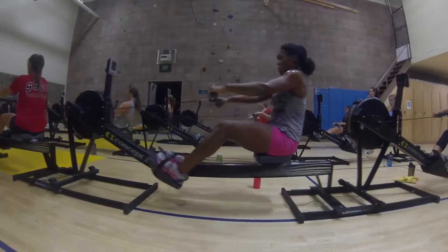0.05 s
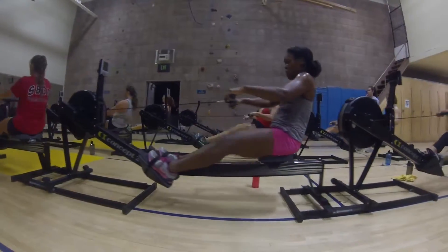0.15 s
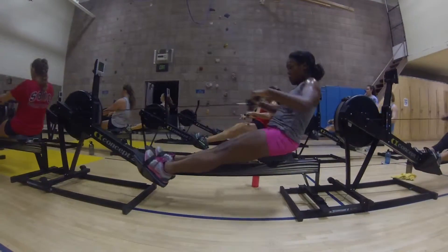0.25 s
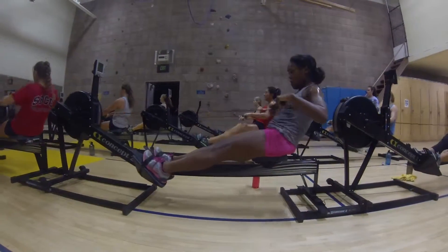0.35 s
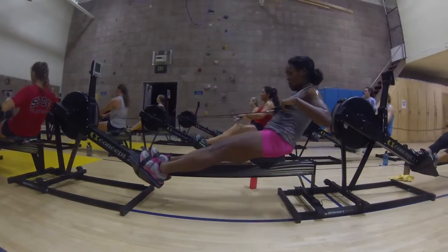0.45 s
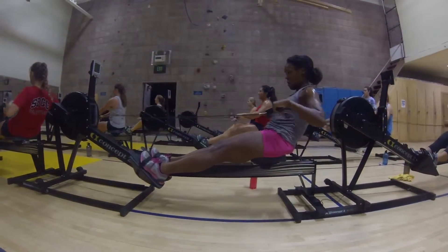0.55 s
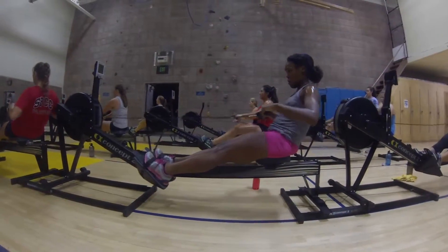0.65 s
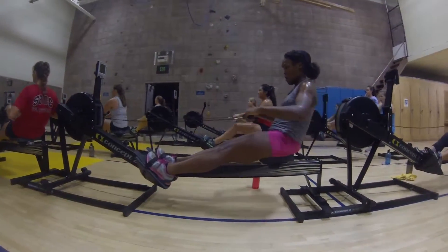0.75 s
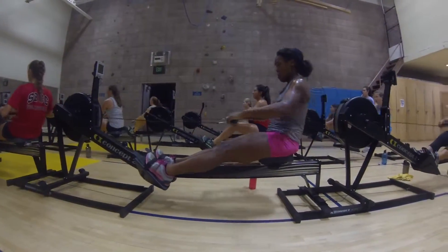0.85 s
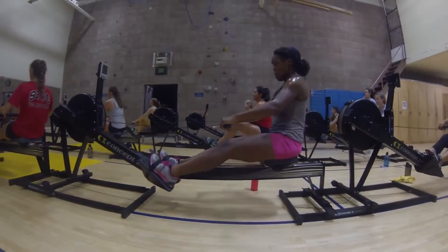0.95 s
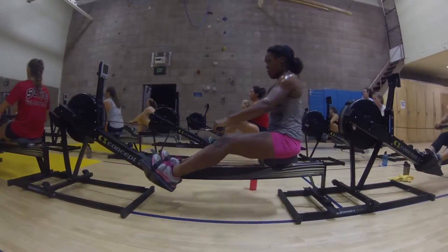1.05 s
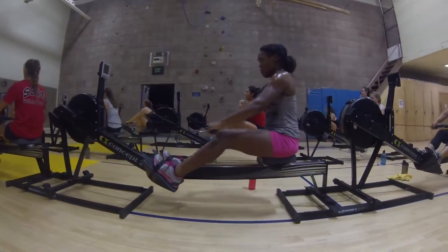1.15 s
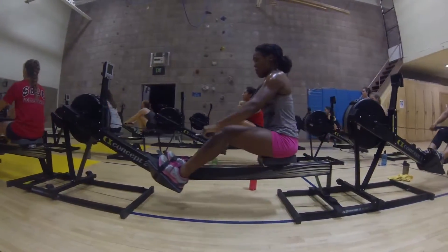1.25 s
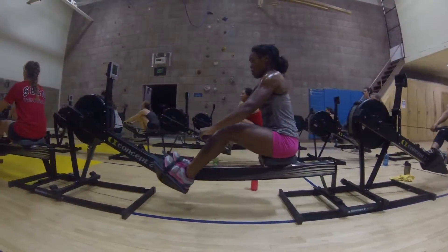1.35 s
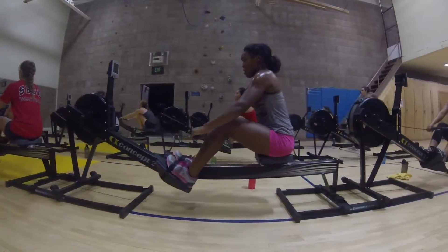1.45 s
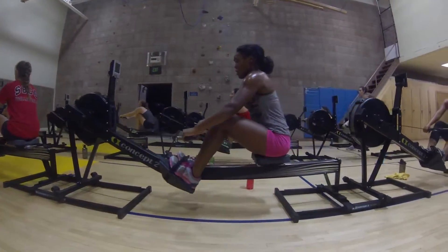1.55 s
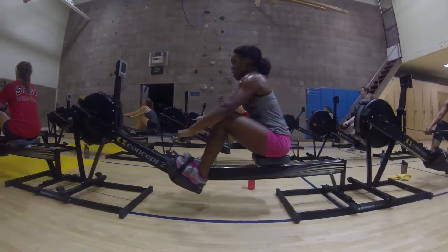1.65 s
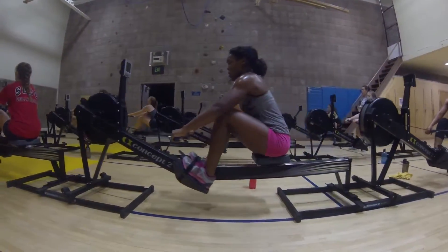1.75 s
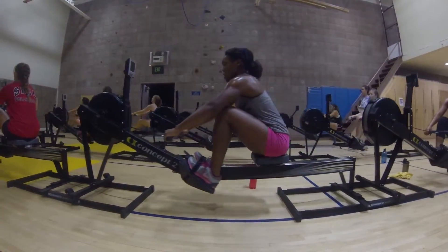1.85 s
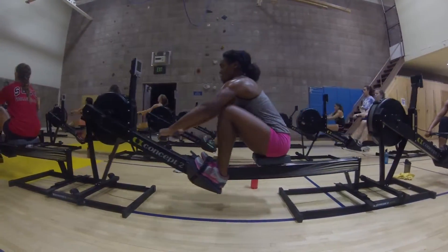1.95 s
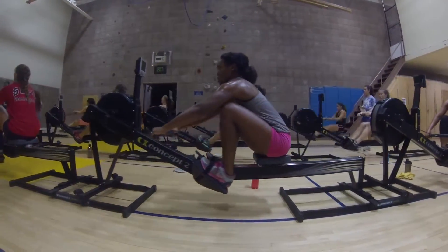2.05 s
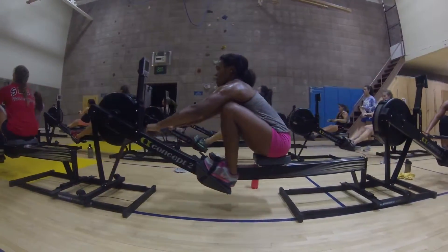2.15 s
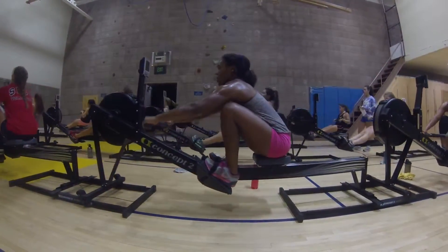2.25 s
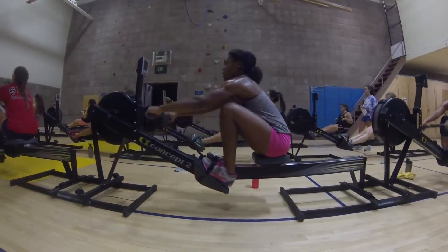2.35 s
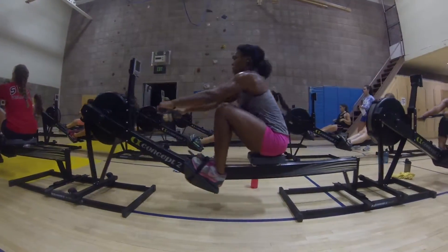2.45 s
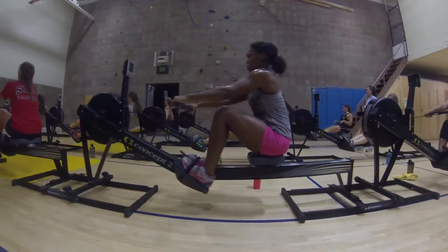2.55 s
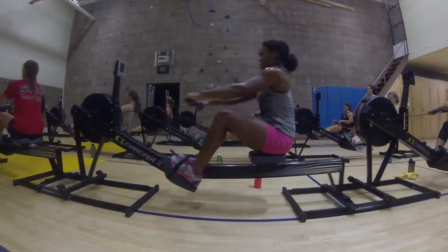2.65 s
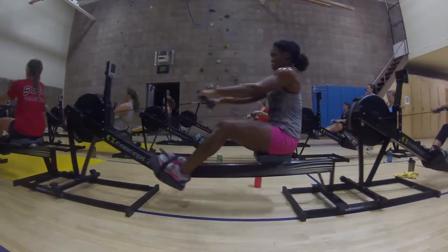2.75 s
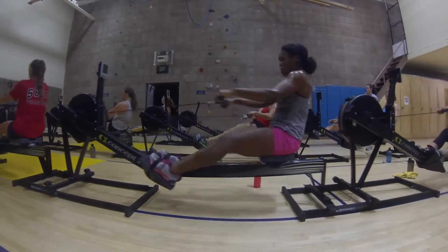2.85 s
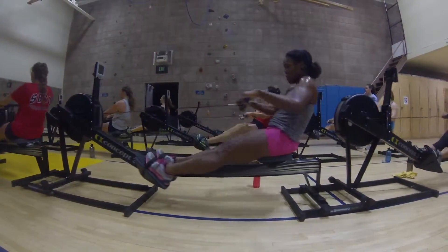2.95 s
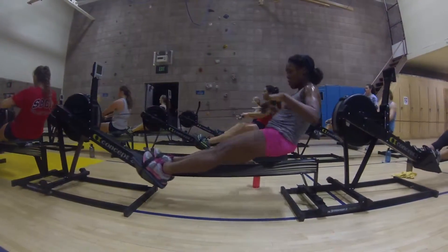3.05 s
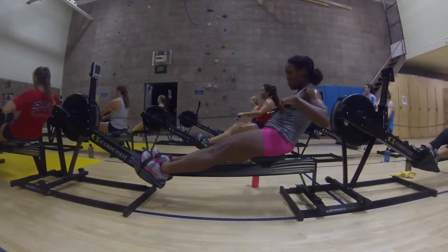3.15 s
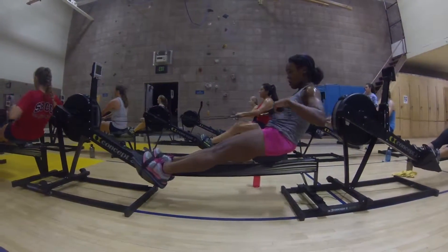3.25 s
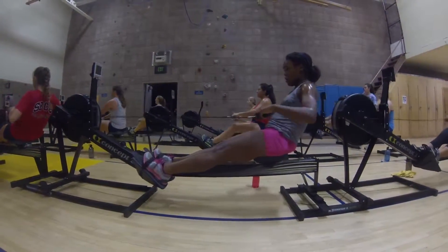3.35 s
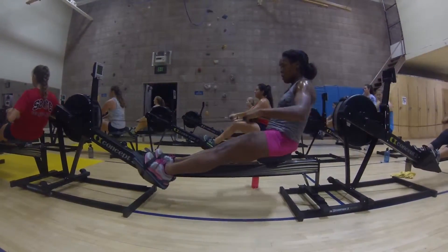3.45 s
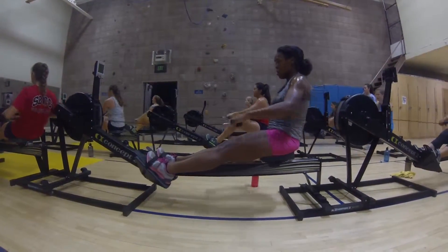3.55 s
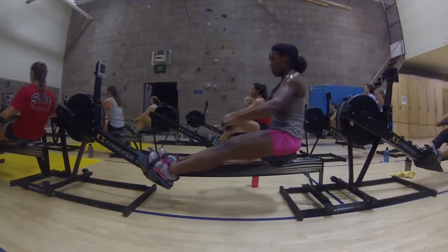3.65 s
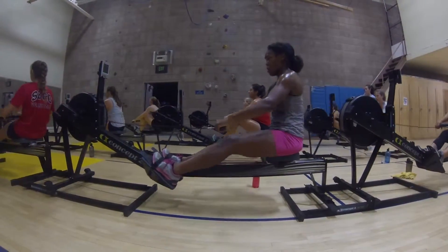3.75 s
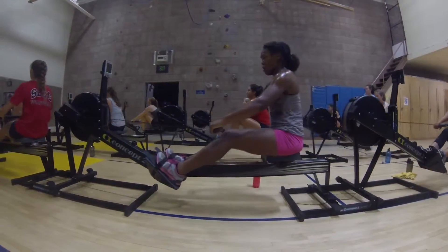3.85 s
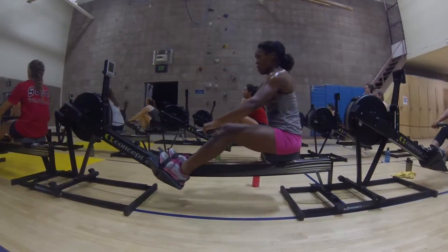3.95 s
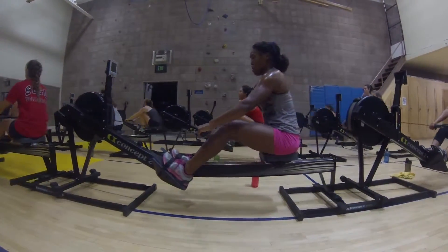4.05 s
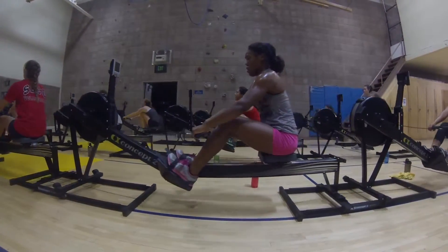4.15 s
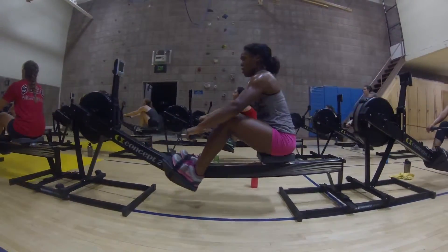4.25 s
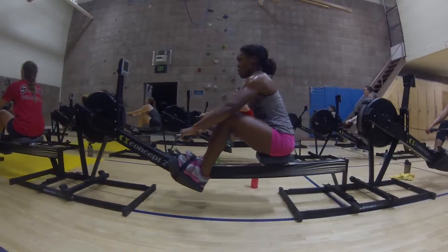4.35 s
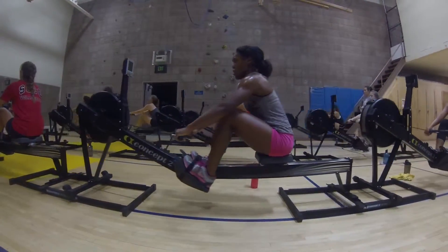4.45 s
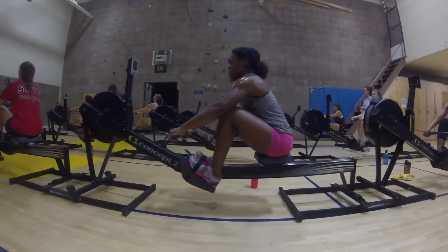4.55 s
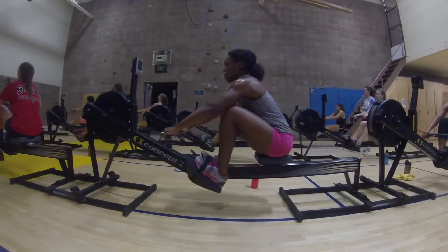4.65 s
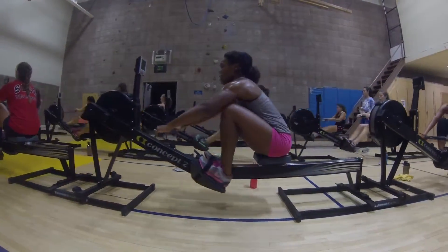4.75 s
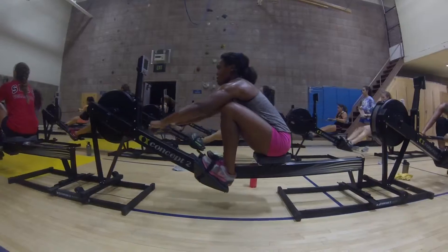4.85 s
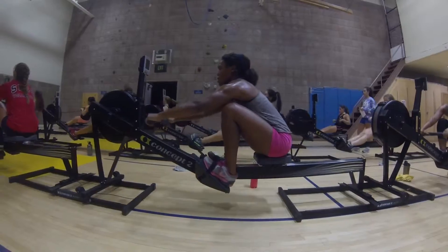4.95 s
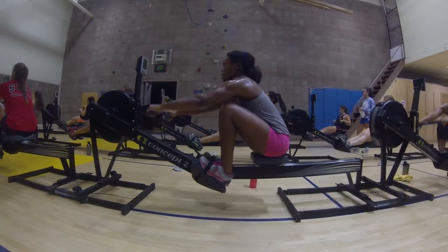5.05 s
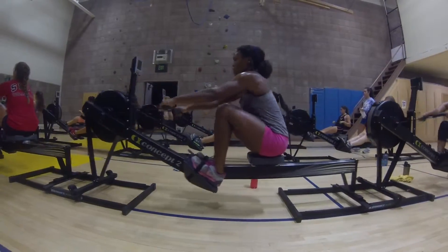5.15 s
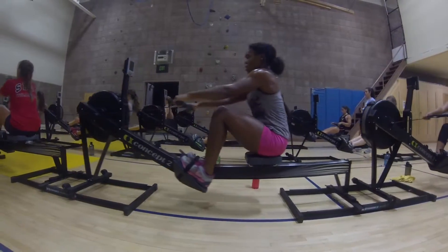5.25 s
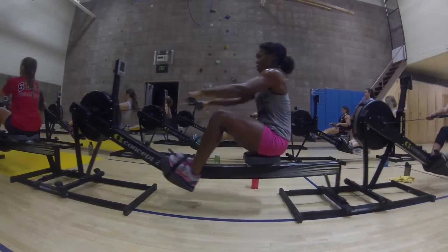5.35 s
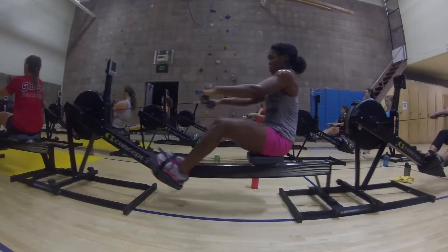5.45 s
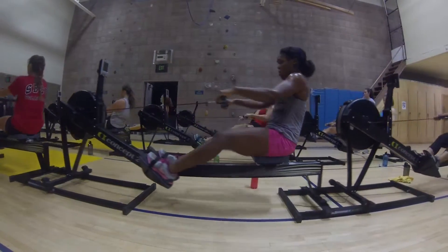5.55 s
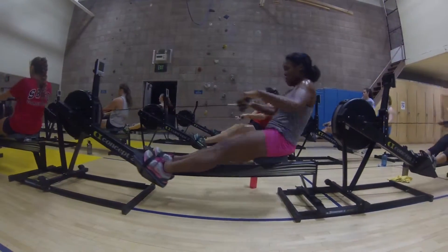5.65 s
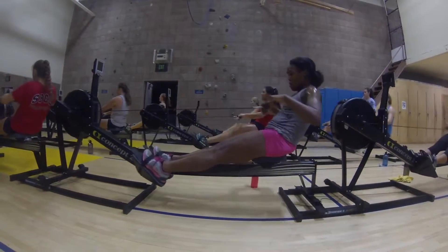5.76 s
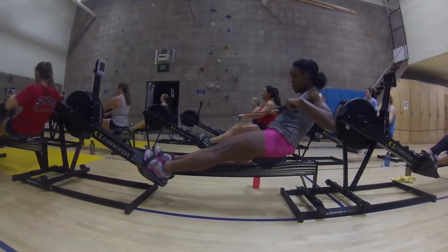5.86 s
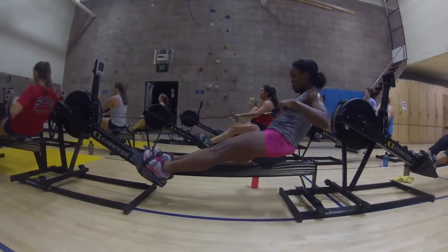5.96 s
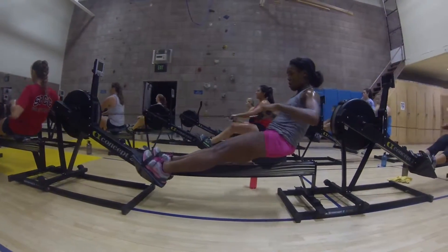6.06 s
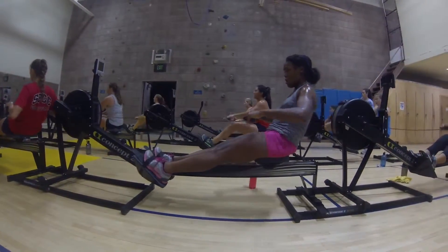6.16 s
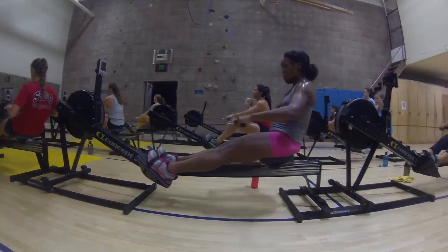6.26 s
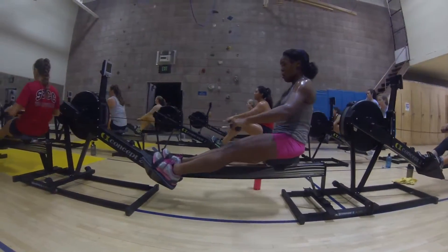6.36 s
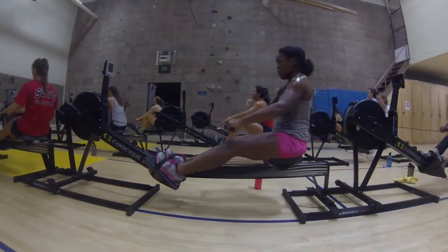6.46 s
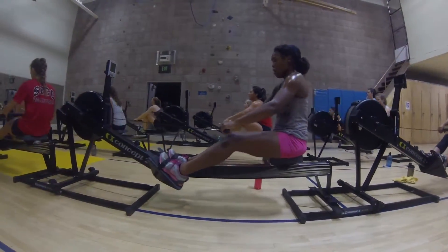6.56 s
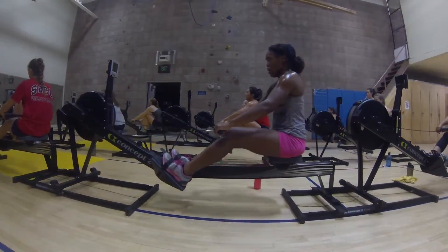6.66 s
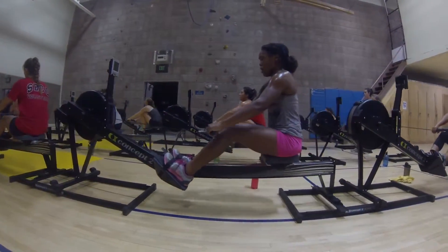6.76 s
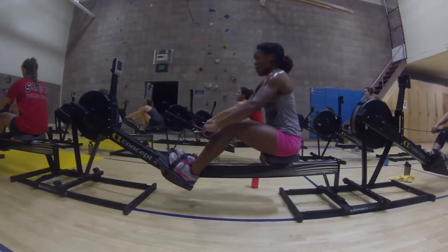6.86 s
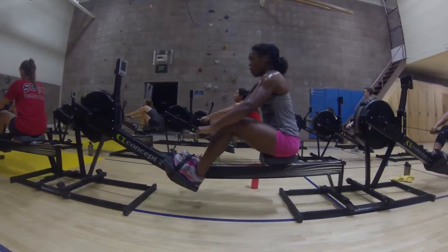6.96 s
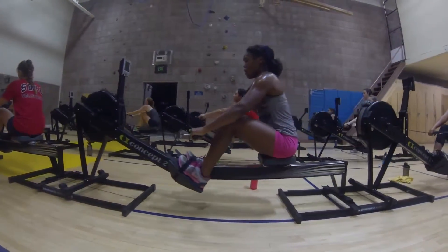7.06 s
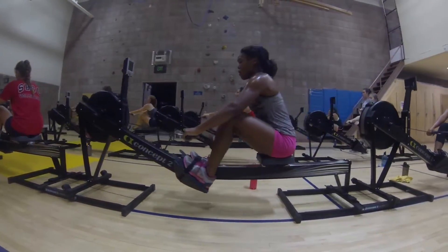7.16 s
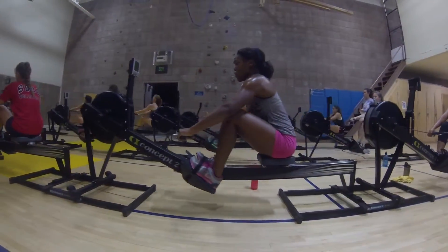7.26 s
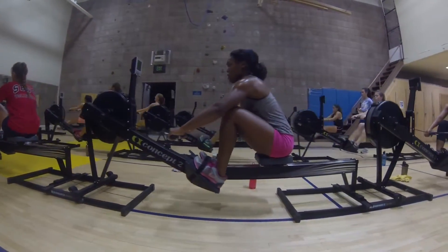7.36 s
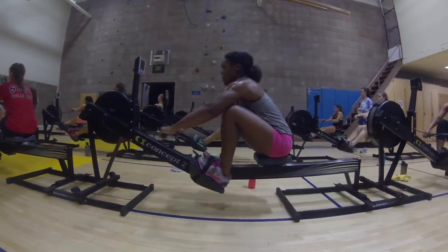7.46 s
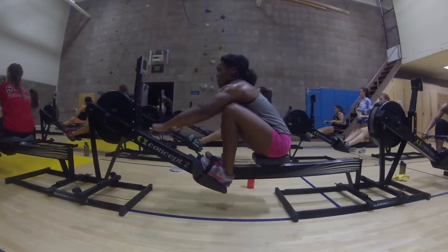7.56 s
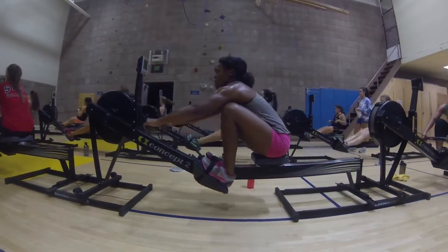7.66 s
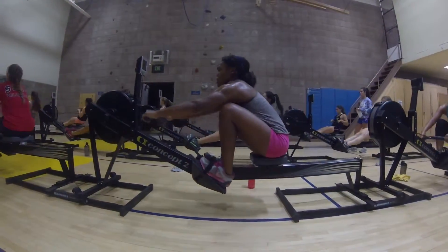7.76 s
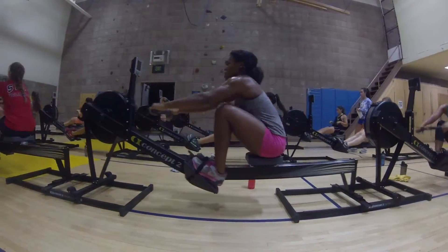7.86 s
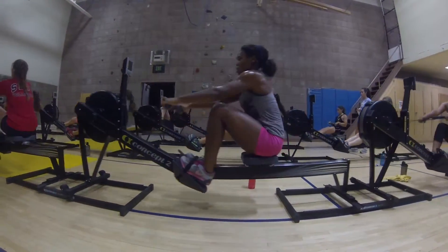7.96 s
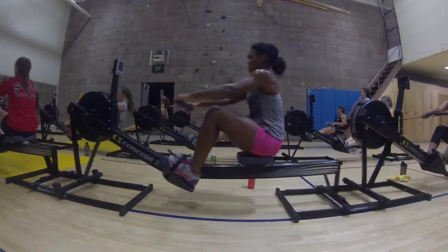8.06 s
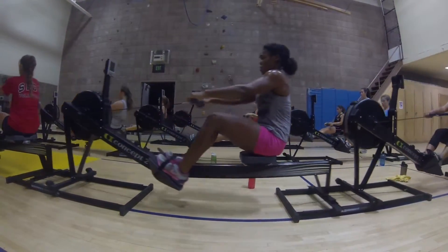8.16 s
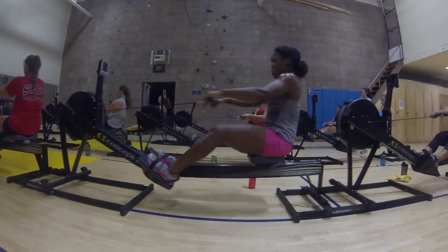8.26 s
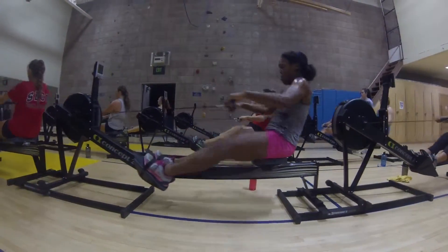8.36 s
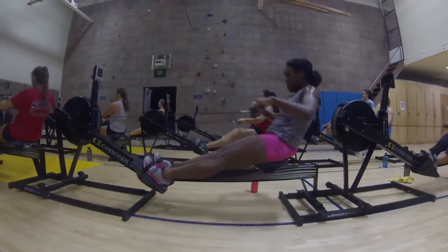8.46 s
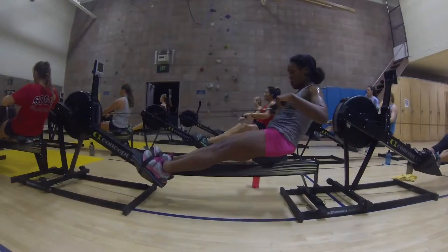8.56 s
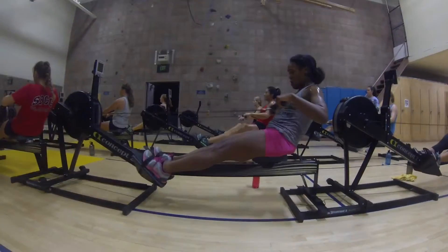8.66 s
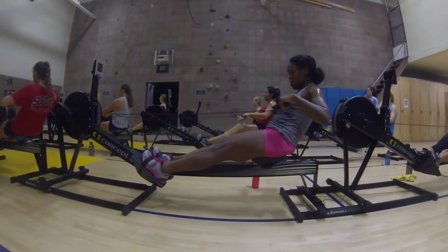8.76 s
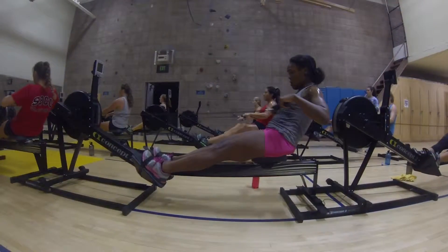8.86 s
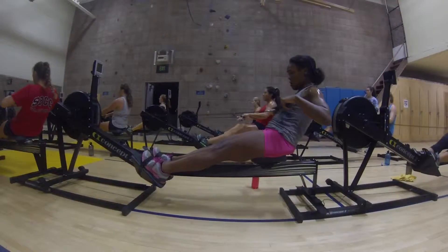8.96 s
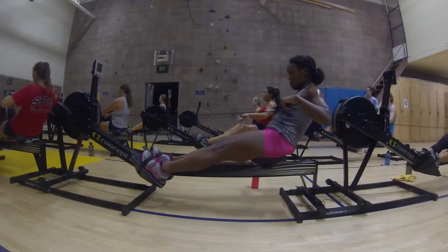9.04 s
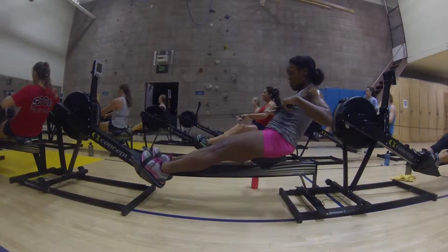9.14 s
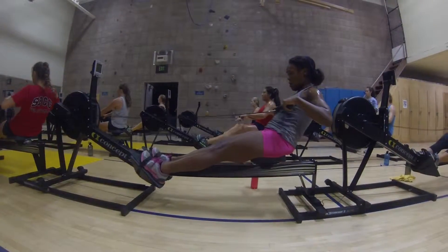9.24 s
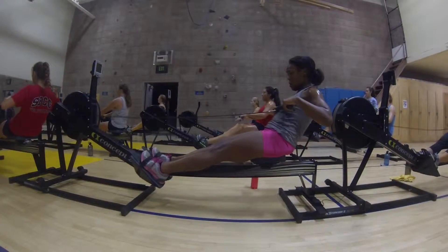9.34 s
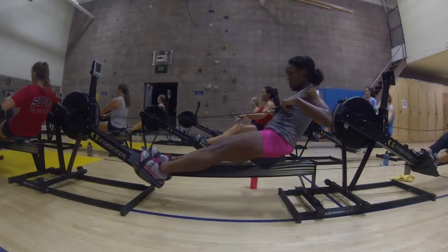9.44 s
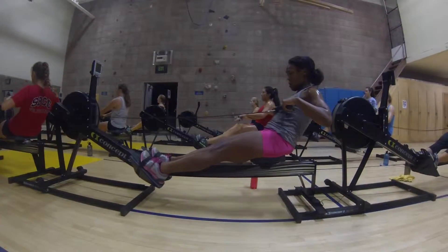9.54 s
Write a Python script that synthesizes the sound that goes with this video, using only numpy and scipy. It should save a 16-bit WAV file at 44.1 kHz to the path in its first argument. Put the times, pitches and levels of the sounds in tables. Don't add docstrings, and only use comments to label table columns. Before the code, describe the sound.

Rowing machine flywheels whir steadily in a gym hall, swelling with each stroke, with sharp plastic ticks and low floor thuds, heard through a sealed case.

```python
import sys
import numpy as np
from scipy import signal
from scipy.fft import rfft, irfft
from scipy.io import wavfile
from scipy.ndimage import uniform_filter1d

SR = 44100
rng = np.random.default_rng(int(sys.argv[2]) if len(sys.argv) > 2 else 0)


def materialize(psi):
    bounded = np.clip(np.atleast_2d(psi).T, -1, 1)
    quanta = np.round(bounded * 32767).astype(np.int16)
    wavfile.write(sys.argv[1], SR, quanta)


def gain_from_decibels(decibels):
    exponent = np.asarray(decibels, float) / 20
    return 10 ** exponent


N = 423360


def unit(x):
    return x / np.sqrt(np.mean(x ** 2))


def band(x, lo_hz, hi_hz):
    return signal.sosfilt(signal.butter(2, (lo_hz, hi_hz), "bandpass", fs=SR, output="sos"), x)


def walk(rate):
    hold = int(SR / rate)
    levels = np.repeat(rng.standard_normal(N // hold + 1), hold)
    return 1.4 * uniform_filter1d(uniform_filter1d(levels, hold), hold)[:N]


def swells(rows, attack_s, release_s):
    t = np.arange(N) / SR
    total_db = np.zeros(N)
    for start_s, rise_db, hold_s in rows:
        corners_s = np.cumsum([0, attack_s, abs(hold_s), release_s])
        total_db += np.interp(t - start_s, corners_s, [0, rise_db, rise_db, 0])
    return total_db


def damped_mode(push, hz, t60_s):
    pole = np.exp(2j * np.pi * hz / SR - np.log(1000) / (t60_s * SR))
    return signal.lfilter([1], [1, -pole], push).imag


def contact(ms):
    t = np.arange(1, 600) / SR / (ms / 1000)
    bump = t * np.exp(-t)
    return bump / bump.sum()


def place(at_s, sound):
    return np.pad(sound, (int(at_s * SR), N))[:N]


def fans():
    # (frequency [Hz], density [dB per Hz])
    air = [(35, -28.5), (60, -5), (216, -8.5), (278, -6.5), (510, -12), (1050, -13), (1320, 0), (2150, -17),
           (3590, -20.5), (4430, -28), (5340, -21.5), (7920, -29.5), (8900, -32), (14200, -40),
           (15600, -49)]
    # (frequency [Hz], width [Hz], gain [dB], negative is a notch)
    wall = [(1236, 325, 3), (1866, 150, 3), (3630, 460, 6.5), (4394, 440, -4.5), (5520, 460, 2.5),
            (8060, 630, 5), (8980, 420, -5), (10000, 900, 2), (14200, 900, 1.5), (445, 190, -3.5),
            (887, 52, 3), (1121, 99, -3), (2110, 150, -2.5), (2300, 120, 1.5), (3120, 490, -0.5),
            (5900, 400, -4.5), (7300, 400, -2), (11200, 600, 2), (12300, 1000, -2), (13600, 600, 3.5),
            (15060, 500, 4)]
    # (start [s], whir rise [dB], hold [s])
    pulls = [(-.1, 2.5, 0.073), (.55, 2.5, 0.19), (1.2, 0.5, 0.5), (1.7, 1.5, .2), (2.45, 1.5, 0.32),
             (3.36, 3, 0.19), (4.3, 2.5, 0.38), (5.25, 2.5, 0.11), (6.1, 2.5, 0.33), (6.78, 1, .05),
             (7.15, 2.5, 0.097), (7.7, 2, 0.45), (8.3, 2, .2)]
    # (start [s], chain hiss rise [dB])
    drives = [
        (.45, 4),
        (3.3, 4.5),
        (6.05, 4.5),
        (8.3, 4.5),
    ]

    hz = np.maximum(np.fft.rfftfreq(N, 1 / SR), 1)
    air_hz, air_db = np.transpose(air)
    colour_db = np.interp(np.log(hz), np.log(air_hz), air_db)
    for mode_hz, width_hz, gain_db in wall:
        colour_db += gain_db / (1 + (2 * (hz - mode_hz) / width_hz) ** 2)
    turbulence = rfft(rng.standard_normal(N)) * gain_from_decibels(colour_db)

    pull_db = swells(pulls, attack_s=0.07, release_s=0.25)
    drive_db = swells([(start_s, rise_db, 0.37) for start_s, rise_db in drives], attack_s=0.25, release_s=0.36)

    rush = 1 / (1 + (hz / 750) ** 4)
    chain = (1 - rush) / (1 + ((hz - 3600) / 600) ** 4)
    top = (1 - rush - chain) / (1 + (4500 / hz) ** 6)
    upper = (1 - rush - chain - top) / (1 + (2100 / hz) ** 8)
    whir = 1 - rush - chain - top - upper

    layers = [(rush, 0.23 * pull_db - 0.8 + 0.68 * walk(12)),
              (upper, 0.26 * pull_db + 0.5 * drive_db - 0.4 + 0.57 * walk(8.5)),
              (whir, pull_db - 1.3 + 0.5 * walk(14)),
              (chain, drive_db - 1.55 + 0.7 * walk(10)),
              (top, 0.15 * drive_db - 0.4 + 0.33 * walk(4.1))]
    mix = sum(irfft(turbulence * share, N) * gain_from_decibels(level_db) for share, level_db in layers)
    whir_rms = np.std(band(irfft(turbulence, N), 1100, 2000))
    return gain_from_decibels(-46.5) / whir_rms * mix


def floor():
    # (start [s], rise [dB], hold [s])
    rolls = [(0.03, 12.5, 0.045), (.35, 6.5, 0.52), (1.4, 5, 0.061), (2.2, 4, 0.058), (3.55, -1, 0.14),
             (4.25, 5, 0.096), (5.0, 4, 0.12), (5.55, 7, 0.044), (5.95, 2, 0.038), (6.12, 4, 0.096),
             (6.7, 5.5, .2), (7.35, 9, 0.06), (8.13, 10, 0.055), (8.38, 11, .03)]
    # (time [s], peak [dB], direction [sign],
    # push [ms])
    thuds = [(0.614, -39, -1, 1.5), (0.676, -29.5, 1, 1.85), (1.152, -35.5, 1, 1.1), (2.515, -29.5, 1, 1.5),
             (3.5, -41, 1, 2.3), (3.574, -37, -1, 2.1), (3.683, -28.5, -1, 1.8), (6.013, -38.5, 1, 1.9),
             (6.204, -39, -1, 2.2), (6.277, -33, -1, 0.9), (6.292, -29, 1, 1.7), (6.391, -32.5, -1, 2.3),
             (7.045, -37, 1, 1.4), (7.295, -32, 1, 1.2), (7.56, -37.5, 1, 1.7), (8.202, -30.5, -1, 1.35),
             (8.245, -36, -1, 1.4), (8.341, -29.5, -1, 0.73), (8.354, -27, 1, 2.5), (8.367, -31, 1, 2.1),
             (8.476, -26, 1, 2.7), (8.489, -25, 1, 0.78), (8.508, -23.5, -1, 2.9)]

    rumble = unit(band(band(rng.standard_normal(N), 5.7, 44.0), 5.0, 75.0))
    roll_db = swells(rolls, attack_s=0.05, release_s=0.06)
    shaking = rumble * gain_from_decibels(-49.5 + roll_db + 1.5 * walk(7.7))

    t = np.arange(N) / SR
    for at_s, peak_db, way, push_ms in thuds:
        near = t[int((at_s - 0.03) * SR):int((at_s + 0.06) * SR)]
        u = (near - at_s) * 1000 / push_ms
        rebound = gain_from_decibels(-11) * np.exp(-((u - 5.0) / 4.2) ** 2 / 2)
        jolt = np.exp(-u ** 2 / 2) - rebound
        shaking = shaking + place(at_s - 0.03, np.sign(way) * gain_from_decibels(peak_db) * jolt)

    rocking = damped_mode(place(8.531, contact(0.6)), hz=42.9, t60_s=0.46)
    return shaking + gain_from_decibels(-25.5) * rocking


def spot_db(hz, wall_db, contact_ms):
    level_db = wall_db * (1000 < hz < 1400)
    level_db += 4 * (2500 < hz < 4400 or hz > 5600)
    return level_db - 130 * contact_ms * (hz > 4400)


def ticks():
    # (time [s], peak [dB], contact [ms], wall ring [dB], low thump [dB])
    slips = [(.152, -4.5, 0.011, 1.5, -55), (0.3934, -15.5, 0.039, 2, -45),
             (0.7981, -10.5, 0.021, 3.5, -49), (1.2051, -18.5, 0.086, 7.5, -28.5),
             (1.4686, -14.5, 0.066, 2.5, -43), (1.847, -33.5, .06, 11, -29), (2.665, -33.5, 0.069, 24, -36),
             (4.065, -8.5, 0.026, 3, -50), (4.758, -16.5, 0.074, -0.5, -35), (6.244, -33, 0.082, 11, -37),
             (8.4704, -22, 0.11, 4, -21), (8.497, -31, .07, 7, -31)]
    # (frequency [Hz], level [dB], t60 [s], polarity [sign])
    struck_modes = [(820, -17, .016, -1), (1260, -12.5, .024, 1), (1556, -5, 0.013, 1),
                    (1932, 1, 0.0074, -1), (2120, -16, 0.0097, -1), (2547, -21.5, .008, 1),
                    (2877, -17.5, 0.012, 1), (3430, -21, 0.012, -1), (3885, -12, 0.0092, -1),
                    (5040, -8, .004, 1), (6270, -21.5, 0.01, -1), (7260, -35, .006, 1),
                    (7940, -20, 0.006, -1), (11000, -31.5, 0.0054, 1)]
    bare_edge = (14000, -30.5, 0.002, 1)
    rattle_t60_s = 0.1

    out = np.zeros(N)
    for at_s, peak_db, contact_ms, wall_db, thump_db in slips:
        blow = np.pad(contact(max(contact_ms, 0.005)), (int(0.48e-3 * SR), 1500))
        touch = contact(max(contact_ms + 0.028, 0.005))
        touch = np.pad(touch, (0, len(blow)))[:len(blow)]
        push = blow - gain_from_decibels(-8.0) * touch

        tick = np.zeros(len(push))
        for hz, level_db, t60_s, polarity in [*struck_modes, bare_edge]:
            gain = np.sign(polarity) * gain_from_decibels(level_db + spot_db(hz, wall_db, contact_ms))
            tick += gain * damped_mode(push, hz, t60_s)
        thump = unit(damped_mode(blow, hz=300.0, t60_s=0.0075))
        tick = tick / abs(tick).max() - gain_from_decibels(thump_db) * thump

        fade = gain_from_decibels(-40 - 60 * np.arange(len(tick)) / SR / rattle_t60_s)
        tick = tick + fade * unit(band(rng.standard_normal(len(tick)), 2400, 3650))
        out += place(at_s + 0.00033, gain_from_decibels(peak_db) * tick)
    return out + latch()


def latch():
    chirp = damped_mode(np.pad([1.], (0, 2000)), hz=2337, t60_s=0.04)
    return place(8.4955, gain_from_decibels(-42) * chirp)


def scene():
    return (fans() + floor() + ticks())[None]


def low_pass(x):
    return signal.sosfilt(signal.butter(12, 15700, fs=SR, output="sos"), x)


def record(dry):
    stop, go, end = (int(s * SR) for s in (8.5674, 8.5774, 8.5942))
    held = np.where(np.arange(N) < stop, dry, np.roll(dry, go - stop, axis=1))
    on = np.repeat([1., 0, 1, 0], np.diff([0, stop, go, end, N]))
    on = uniform_filter1d(on, size=9)
    top_cut = signal.ellip(10, 0.2, 60, 15250, fs=SR, output="sos")
    mix = signal.sosfilt(top_cut, held * on)
    return low_pass(mix)


dry = scene()
out = record(dry)
materialize(out)
```